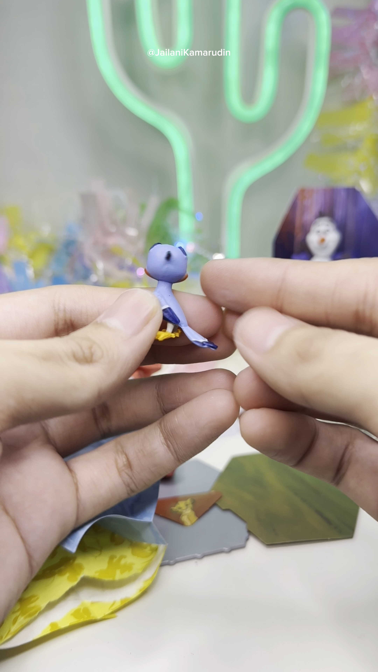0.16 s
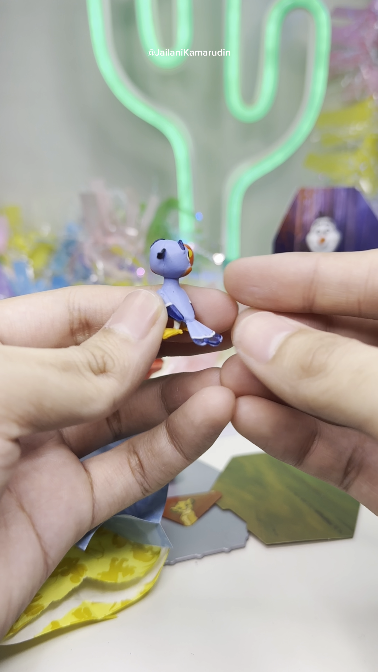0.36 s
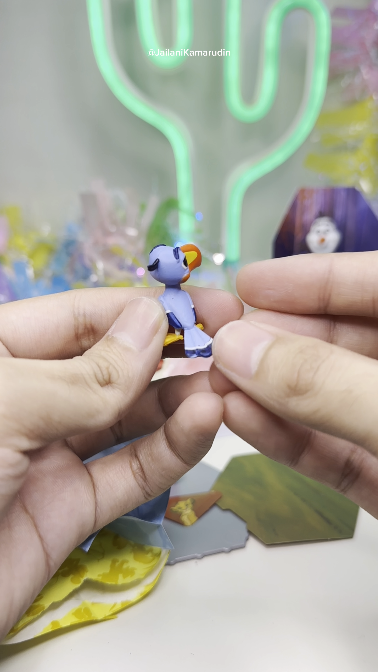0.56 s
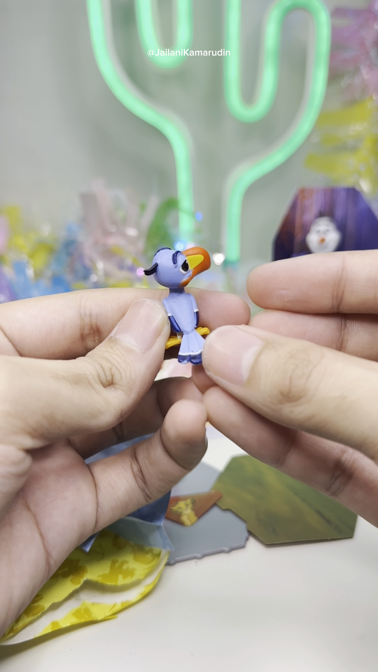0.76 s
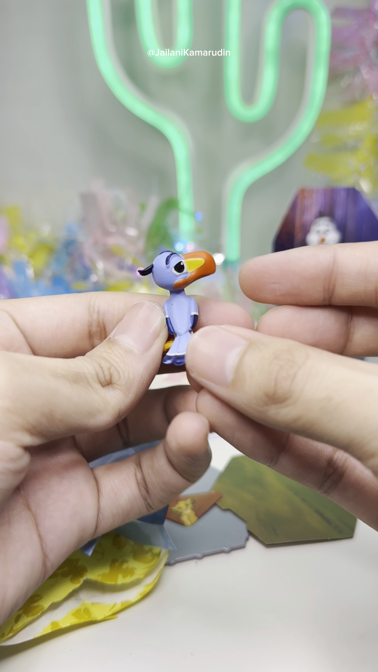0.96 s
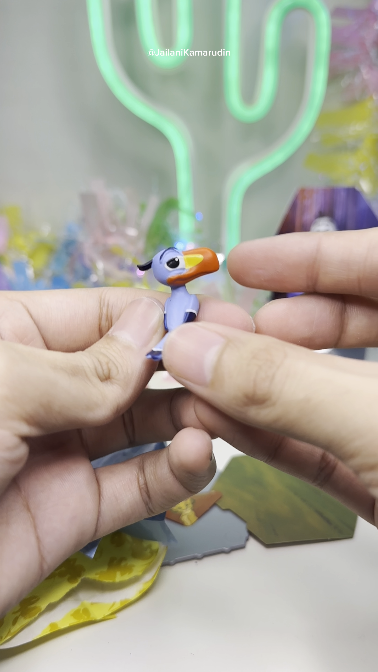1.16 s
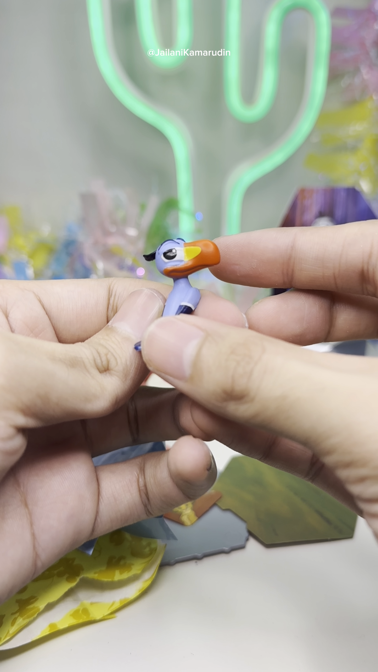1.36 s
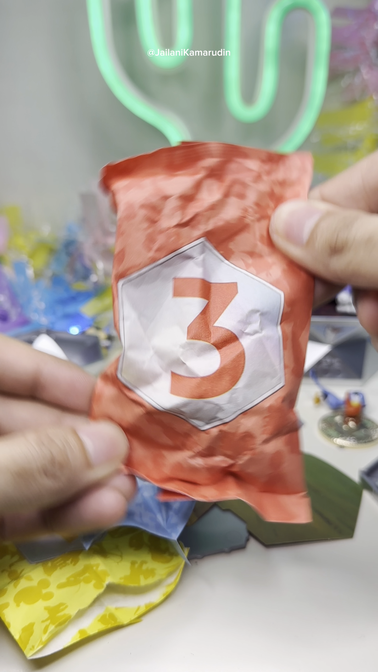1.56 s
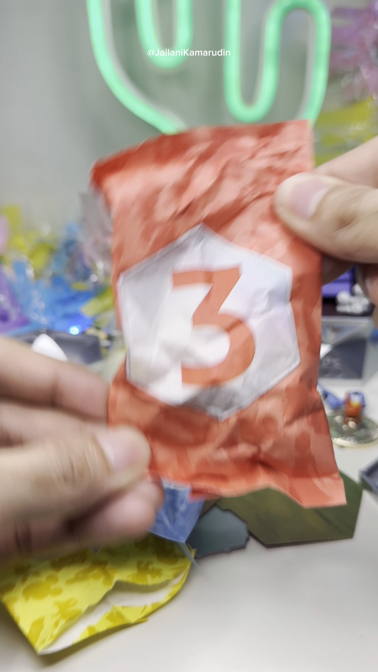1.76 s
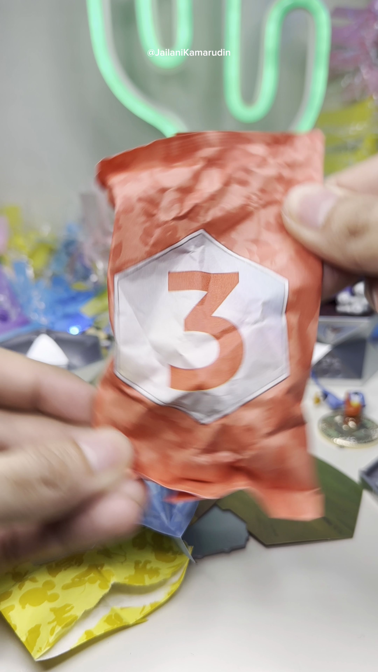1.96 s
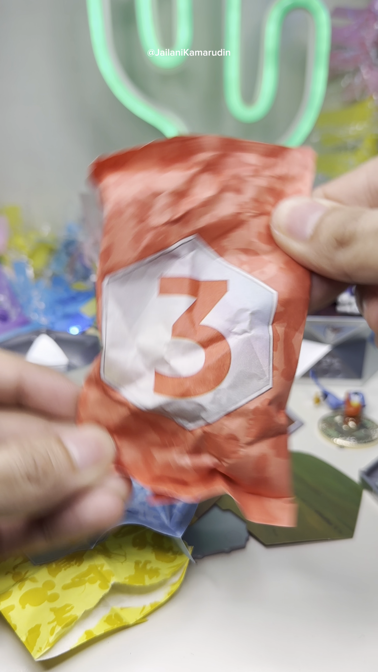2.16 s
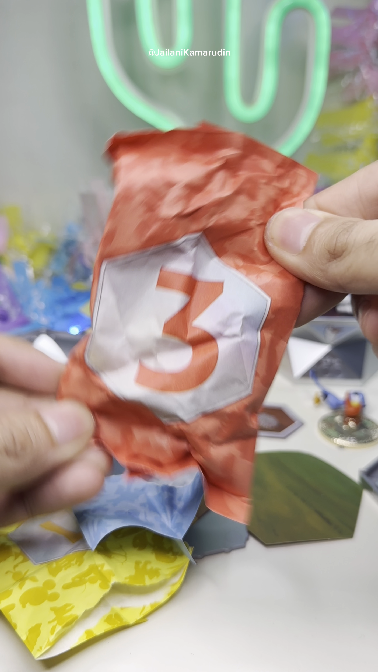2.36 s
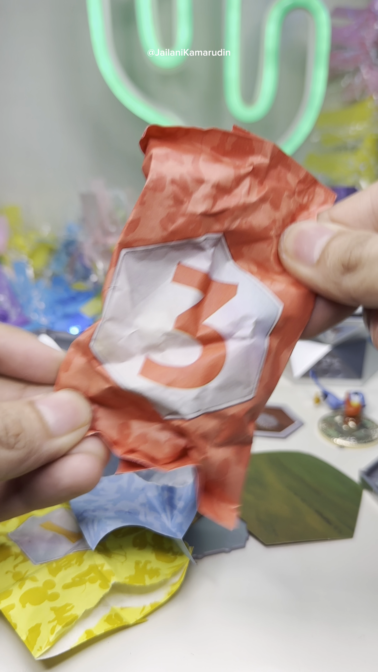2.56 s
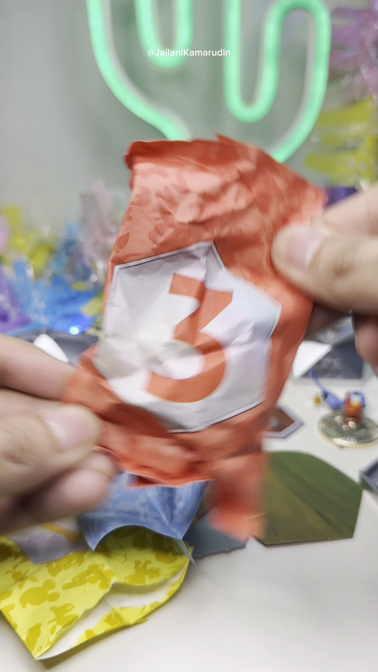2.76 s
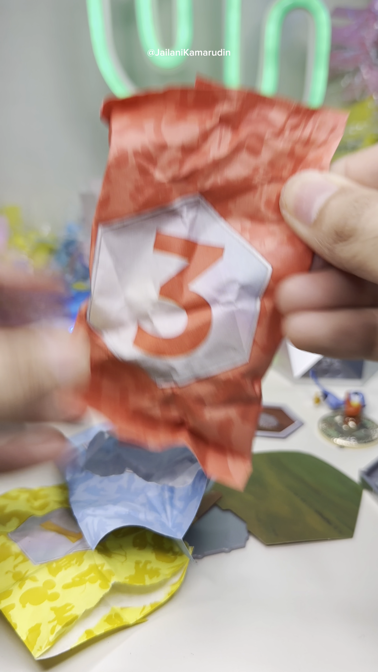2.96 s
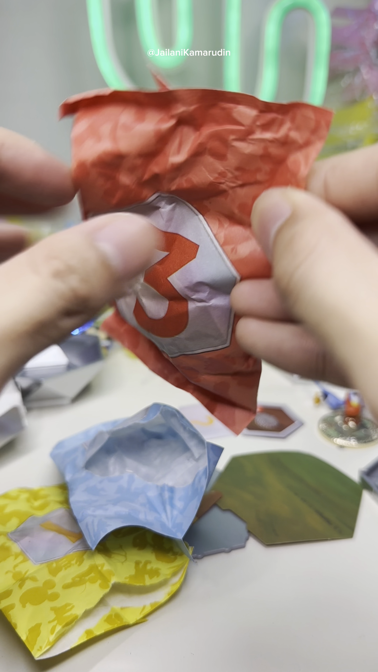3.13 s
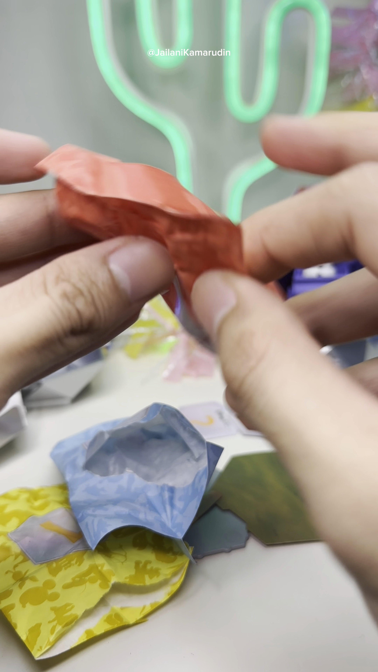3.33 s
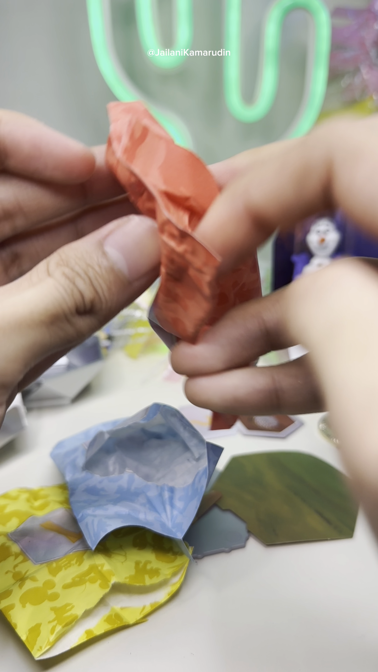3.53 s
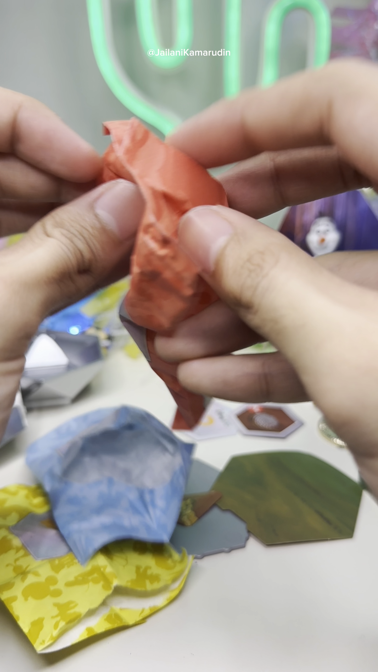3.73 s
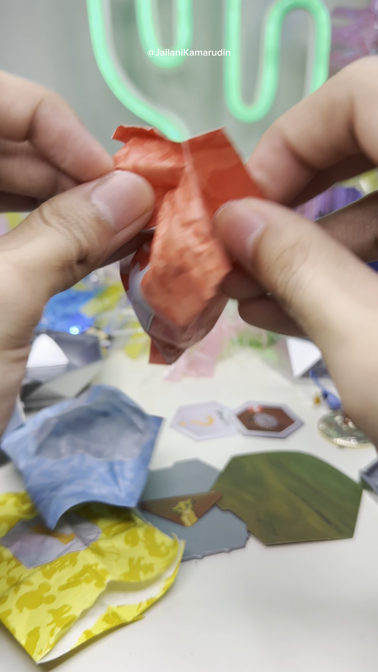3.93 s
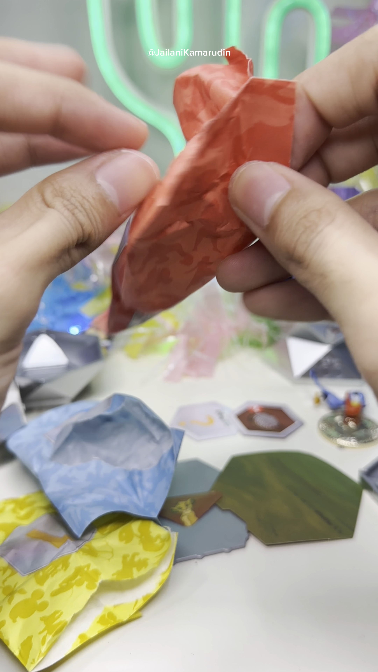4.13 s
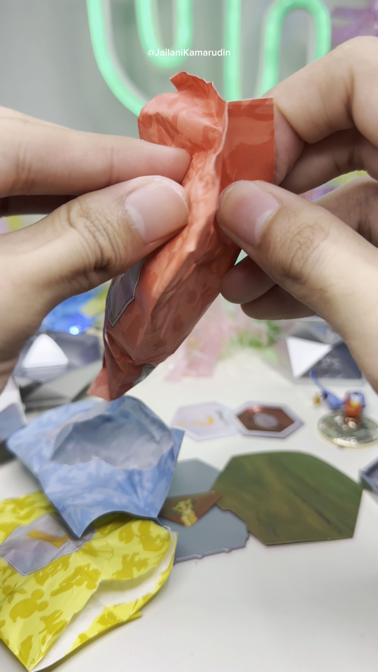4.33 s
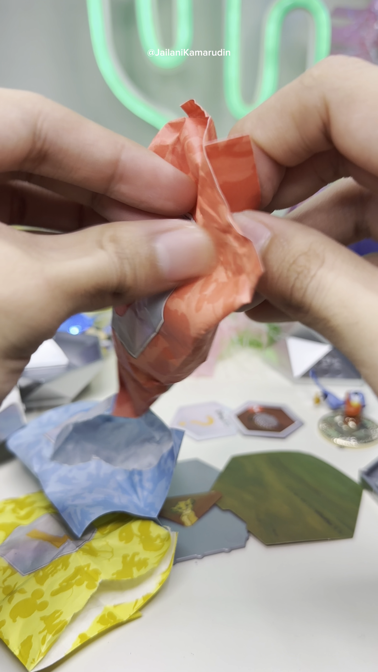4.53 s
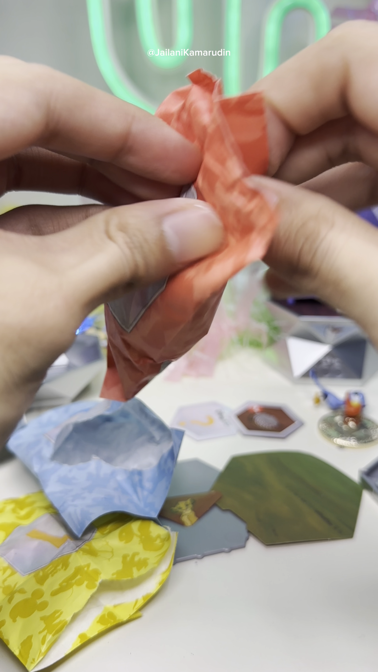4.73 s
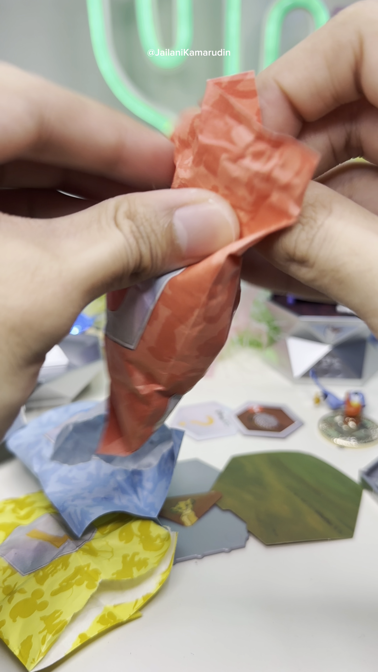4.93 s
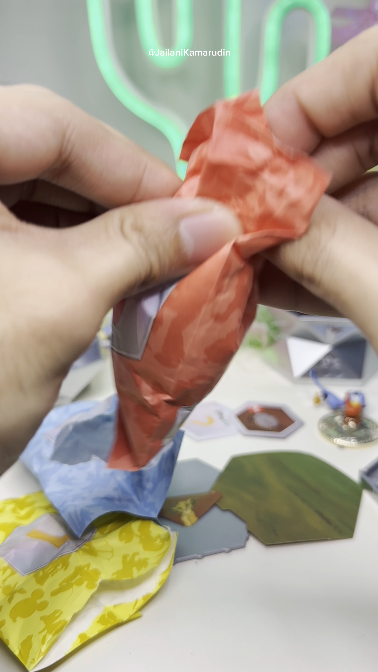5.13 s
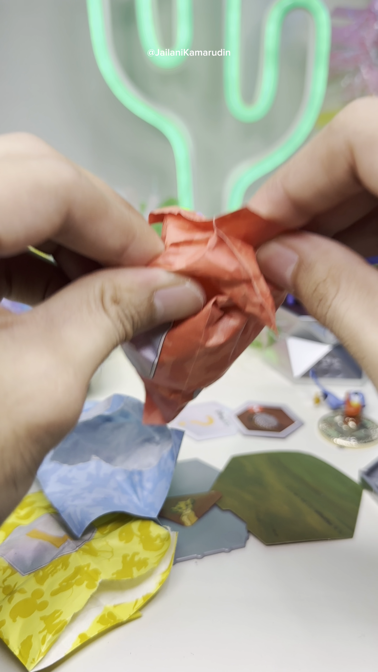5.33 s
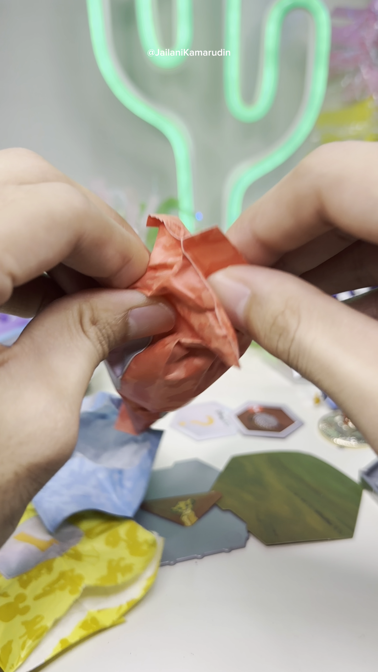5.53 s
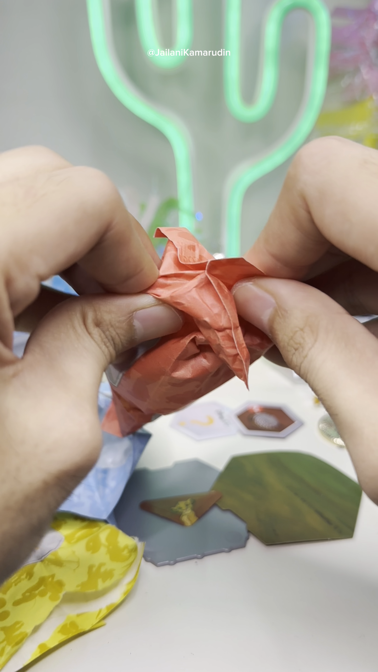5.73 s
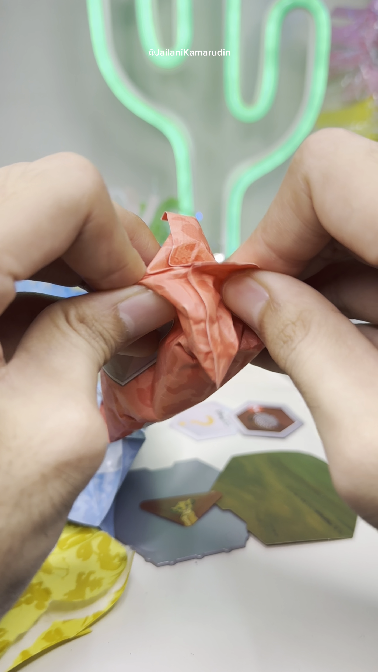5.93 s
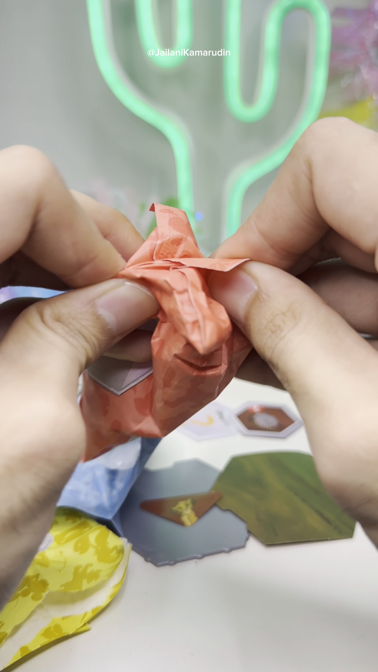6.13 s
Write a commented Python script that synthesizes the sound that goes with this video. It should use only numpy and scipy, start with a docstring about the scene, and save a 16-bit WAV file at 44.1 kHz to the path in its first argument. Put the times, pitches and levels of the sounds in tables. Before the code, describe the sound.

After near silence over a low hum, stiff thin paper snaps and crinkles close by, growing busier as its glued seam peels in stuttering slips.

```python
"""Fingers rub over a small plastic figure, then shake, crumple and pull at a thin paper bag, close to
a stereo microphone in a quiet room. Creases snap as noise bursts over a bed of tiny random clicks;
squeezes scrape ringing folds. A glued seam peels in quick slips that pluck damped modes, and the bag
flaps in one low mode. A noise rumble with a wavering hum and a faint whirr lies beneath."""
import sys
import numpy as np
from scipy import signal
from scipy.fft import rfft, irfft, next_fast_len
from scipy.io import wavfile
from scipy.ndimage import uniform_filter1d

SR = 44100
rng = np.random.default_rng(int(sys.argv[2]) if len(sys.argv) > 2 else 0)


def int16_out(signal):
    """Quantize to a 16-bit WAV file."""
    q = np.round(np.clip(np.atleast_2d(signal).T, -1, 1) * 32767)
    wavfile.write(sys.argv[1], SR, q.astype(np.int16))


N = 277389

# creases snapping, boom and treble relative to the middle peak:
# time_s, middle_peak_db, boom_db, treble_db, ring_hz
SNAPS = [(1.5006, -33, -6.5, -22, 1320), (1.5712, -21, -12, -5, 1450), (1.6174, -27, -9, -35, 1570),
         (1.7076, -19, -11, -31, 1300), (1.773, -49, -8, 6, 2000), (1.7996, -22, -16, 5, 1270),
         (1.818, -13, -19, -20, 2200), (1.8522, -18.5, -33, -5.5, 1400), (1.927, -31, -4, 1, 2850),
         (1.945, -17, -6, -3, 1970), (1.9599, -19.5, -7, 0, 3460), (2.0163, -33, 4.5, -28, 790),
         (2.069, -26.5, -33, -38, 1250), (2.219, -45.5, 3, -13, 2680), (2.252, -42, 2, -10, 2580),
         (2.2678, -31.5, -8, 12.5, 2800), (2.38, -40.5, -17, -18, 2720), (2.448, -45, 3, -15, 2760),
         (2.467, -36.5, 3, -11, 2770), (2.5278, -25, -10, -17, 960), (2.634, -33, -25, -24, 920),
         (2.667, -39, -6, -4, 2780), (2.682, -42.5, 4, 4, 2720), (2.748, -37.5, -14, 2, 2040),
         (2.7919, -40, 7.5, 9.5, 4170), (2.809, -39.5, 4, -2, 1820), (2.857, -44, 6, 5, 2700),
         (2.935, -28.5, -27, 0, 2750), (3.116, -35.5, 6.5, 5.5, 2100), (3.1554, -40, -17, 8, 1230),
         (3.174, -45, -7, 13, 1150), (3.22, -23.5, -2, -1, 1830), (3.2299, -27.5, 0, 6, 1670),
         (3.2452, -21.5, -4, 16.5, 1630), (3.2673, -28, -26, -17, 2460), (3.292, -30, -23, -12, 2430),
         (3.432, -34, -8, 2.5, 1900), (3.4479, -32.5, -4.5, -8, 1930), (3.5083, -30.5, -2.5, -23, 990),
         (3.57, -27, -10, 0, 3700), (3.621, -30.5, 2.5, 13, 2520), (3.655, -39, -4, 25, 4300),
         (3.672, -33, 2, -8, 1910), (3.6953, -25.5, -5, -19, 2560), (3.7602, -27.5, -8, -14, 1190),
         (3.7784, -5, -5, -1, 1650), (3.8076, -17.5, -29, 1, 1700), (3.821, -22, -14, 3, 3200),
         (3.854, -32.5, -1, -19, 1590), (3.8939, -26, -6, -23, 1910), (3.923, -12.5, -12.5, 2.5, 2400),
         (3.968, -22.5, -28, 3, 3380), (4.056, -26, -13, 2, 3330), (4.0731, -25.5, -2, -17, 1680),
         (4.097, -32, 0, -14, 1860), (4.267, -40, -18, 4, 3020), (4.289, -37, -6, -3, 2000),
         (4.299, -24, -4.5, -21, 2200), (4.324, -23.5, -20, 6.5, 2100), (4.3336, -21, -10, 10, 2340),
         (4.3559, -23.5, 7.5, -13, 670), (4.368, -21, -3, 7.5, 1950), (4.379, -22, -12, -18, 2080),
         (4.3904, -11.5, -24, -3, 630), (4.41, -12.5, -13, 3.5, 2080), (4.4151, -8, -27, -1, 600),
         (4.431, -19.5, -1, 4, 1030), (4.493, -27, -17, -20, 2100), (4.518, -28, -31, 5, 2030),
         (4.56, -16, -16.5, 12, 1550), (4.6049, -12.5, -13, 2.5, 654), (4.6602, -18, -38, 8, 2200),
         (4.675, -15.5, -5, 8, 1740), (4.703, -21.5, -8, -10, 1860), (4.746, -17.5, -22, -1.5, 2470),
         (4.839, -20, -9, -3, 2400), (4.8561, -19.5, -9, -13, 2200), (4.8901, -23.5, -14, 4.5, 694),
         (4.931, -22, -18, 10, 4200), (4.9392, -26, -27, -8, 2550), (4.947, -26.5, -28, -4, 810),
         (4.9604, -18.5, -14, 6, 1800), (4.97, -17, -29, -1, 3850), (4.987, -20.5, -39, 6.5, 1900),
         (5.008, -20.5, -16, -12, 3540), (5.04, -34, -9, 8, 900), (5.061, -43, -12, 12, 3920),
         (5.071, -44, -4, 2, 1187), (5.0824, -37, -4, 12.5, 997), (5.0918, -28.5, -9, 1, 1050),
         (5.109, -20, -32, -5, 1000), (5.124, -23.5, -15, -12, 2160), (5.143, -13, -11, -33, 1700),
         (5.1623, -27, -4.5, 11, 4500), (5.168, -25.5, -28, 18.5, 1980), (5.177, -37, -20, 17, 2080),
         (5.219, -30, -15, -22, 1970), (5.235, -31, -8, -16, 3810), (5.2583, -15.5, -3, -0.5, 3530),
         (5.278, -24.5, -8, -19, 3230), (5.309, -28.5, -5, -21, 2060), (5.42, -28, -26, -15, 2200),
         (5.439, -38, -1, -8, 1890), (5.597, -34.5, -6, 6, 1420), (5.616, -48, -10, 3, 2000),
         (5.81, -21.5, -27, 2, 940), (5.8238, -20.5, -5, -23, 940), (5.84, -13, -25, -21, 2700),
         (5.8501, -11, -39, 3, 930), (5.8596, -19.5, -6, -26, 940), (5.8933, -21.5, -11, 3, 2160),
         (5.908, -13.5, -29, -5.5, 1010), (5.917, -20, -12, -17, 1130), (5.9429, -15.5, -21, -12, 3700),
         (5.9816, -24.5, -33, -10, 1190), (6.034, -27, -38, -18, 3380), (6.041, -17, -43, -1.5, 2290),
         (6.0761, -28.5, -9, -19, 1113), (6.091, -30, -17, 0, 2060), (6.1199, -20.5, -33, -26, 2900),
         (6.141, -23, -38, -20, 4450), (6.1496, -13, -40, 4, 2670), (6.162, -27, -29, -17, 2740),
         (6.1771, -27.5, -26, -14, 3130), (6.207, -30.5, -28, -16, 2080), (6.243, -31, -25, 1, 3700),
         (6.251, -32.5, -20, 9, 4370)]
# grip on the bag, as the quietest crackle, treble and boom relative to it:
# time_s, crackle_db, treble_db, boom_db
GRIP = [(1.495, -61, -9, 4), (1.9, -65.5, -4, 6), (2.05, -71.5, -2.5, 14.5), (2.3, -74.5, 2, 18.5),
        (2.6, -61.5, -7, 11.5), (2.9, -54.5, -6, 2.5), (3.13, -57.5, -10, 12), (3.39, -58.5, -10, 0),
        (3.5, -54, -7, -9), (3.62, -49, -1.5, -1.5), (3.95, -47, -2, -13), (4.14, -58.5, 3.5, 5),
        (4.5, -57.5, 6, 7.5), (4.9, -46, -0.5, -10.5), (5.34, -51, -8.5, -14), (5.63, -50.5, -1.5, -12),
        (5.75, -50, 4, -34), (6.03, -50, -6.5, -31), (6.29, -57, 3, -20)]
# squeezes that drag paper over paper, treble and boom relative to the crackle:
# time_s, crackle_db, treble_db, boom_db, fold_ring_hz
SQUEEZES = [(2.32, -55.5, -8, -7, 1000), (2.429, -55.5, -17, 0, 2800), (2.55, -56, -22, 8, 1400),
            (2.68, -54.5, -13, 5, 2800), (2.812, -59, -19, 14, 1020), (2.884, -53.5, -0.5, -13, 2860),
            (3.007, -54.5, 4, 17, 2200), (3.075, -59, -12, 9.5, 900), (3.241, -41.5, 3, 7.5, 1770),
            (3.335, -51.5, 2, -8, 2200), (3.444, -52.5, 0, -1, 2800), (3.573, -48, 5.5, -15, 3680),
            (3.72, -41.5, 5, -10, 2100), (4.01, -48.5, 0.5, -11, 2100), (4.085, -47.5, -2.5, 3.5, 1870),
            (4.181, -47.5, -2.5, -5, 4170), (4.241, -39, -3.5, -9, 2180), (4.402, -34.5, -1, 4, 2070),
            (4.541, -46, 11.5, -2, 8500), (4.691, -34.5, 3.5, -13, 1970), (4.859, -39.5, -2, -8.5, 2300),
            (5.182, -40.5, -0.5, -23, 6900), (5.286, -38.5, -6, -0.5, 1900), (5.37, -40.5, -6, -14, 3620),
            (5.443, -47.5, 1.5, -4, 2100), (5.473, -51.5, 5, -4, 8600), (5.544, -44.5, -7, -8, 1290),
            (5.785, -45.5, 2.5, -23, 3100), (5.962, -46.5, -2, -18, 2100), (6.19, -41.5, 0.5, -27, 3000)]
SQUEEZE_RISE_DB_PER_S, SQUEEZE_FALL_DB_PER_S = 502, 298


def snaps():
    """Buckling: a crease lets go in a noise burst of treble, ringing middle and a later, longer boom."""
    usual_hz, shortens = 1540, 0.25   # the higher a crease rings, the shorter it snaps
    fall_db_per_s = 4000              # before each burst is stretched
    samples = 1536
    time_s, peak_db, boom_db, treble_db, ring_hz = np.transpose(SNAPS)[:, :, None]
    white = rng.standard_normal((len(SNAPS), 5, samples))
    pan_db = rng.normal(0, 0.3, (len(SNAPS), 1))
    length = (usual_hz / ring_hz) ** shortens

    def burst(count, stretch, delay_s):
        """Transient decay: noise with a fast onset, an early accent and an exponential fall."""
        age = np.maximum(np.arange(samples) / SR - delay_s, 0)
        onset = 1 - np.exp(-age / 0.00007)
        accent = 1 + 1.37 * np.exp(-age / 0.00033)
        fall = from_db(-fall_db_per_s * age / (stretch * length))
        return white[:, count] * onset * accent * fall

    ring_bursts = burst(count=0, stretch=0.88, delay_s=0.000098)
    widths_hz = 650 / length[:, 0]
    rung = np.array([resonance(resonance(row, hz, width_hz), hz, width_hz)
                     for row, hz, width_hz in zip(ring_bursts, ring_hz[:, 0], widths_hz)])
    middle_noise = band(burst(count=1, stretch=1.0, delay_s=0), 920, 3880)
    middle = peak_one(peak_one(rung) + 0.79 * peak_one(middle_noise))
    treble_noise = band(burst(count=2, stretch=0.99, delay_s=0), 5000, 15300)
    treble = from_db(treble_db) * peak_one(treble_noise)
    boom_noise = band(band(burst(count=3, stretch=1.04, delay_s=0.00081), 220, 1040), 220, 1040)
    boom = from_db(boom_db) * peak_one(boom_noise)
    # each port faces another part of the sheet
    side = from_db(-17) * peak_one(band(burst(count=4, stretch=0.8, delay_s=0), 390, 6100))
    mid = middle + treble + boom
    pairs = from_db(peak_db) * np.array([mid / from_db(pan_db) + side, mid * from_db(pan_db) - side])
    out = np.zeros((2, N + samples))
    for k, at in enumerate(np.round(time_s[:, 0] * SR).astype(int)):
        out[:, at:at + samples] += pairs[:, k]
    return out[:, :N]


def rustle():
    """Modal excitation: fibre fizz and separate small ticks shake neighbouring patches of the sheet."""
    # air and folds inside the bag colour the crackle: centre_hz, width_hz, level_db re the plain crackle
    bag_air = [(2080, 98, -1.5)]
    # part that reaches the two ports unalike: freq_hz, level_db re the shared part
    unalike_parts = [(1000, -14), (1800, -19), (3500, -15), (4800, -4), (6000, -15), (10000, -11)]
    patches, small_ticks_share, tick_t60_s = 18, 0.75, 0.005   # share is relative to the fizz
    crackle_db, treble_db, boom_db = crackle_levels()

    at = np.flatnonzero(rng.random(N) < 200 * from_db(4 * drift(12)) / SR)   # about 200 ticks per second
    chance, centre, reach = rng.random((len(at), 3)).T
    size = from_db(-3 * np.log(np.maximum(chance, 0.15)))
    white = rng.standard_normal((2, N))
    fall = from_db(-60 / (tick_t60_s * SR))
    fizz = rms_one(grains(7000, spread_db=3) * np.sign(white) * from_db(3 * drift(35)))
    folds = [drift(10) for _ in range(patches + 1)]   # neighbouring patches share a fold

    out = np.zeros((2, N))
    for k, hz in enumerate(np.geomspace(210, 15000, patches)):
        treble_share = np.clip(np.log2(hz / 3000) / 0.95, 0, 1)
        boom_share = np.clip(np.log2(900 / hz) / 1.6, 0, 1)
        # each patch carries its part of the band that it lies in
        level_db = crackle_db - 11.0 - 1.0 * max(np.log2(400 / hz), 0)
        level_db = level_db + treble_share * (treble_db + 7.5) + boom_share * (boom_db + 0.5)
        kicks = np.zeros(N)
        kicks[at] = size * np.exp(-((k / patches - centre) / (0.06 + 0.3 * reach ** 2)) ** 2)
        # rolling the noise gives every patch its own stretch of it
        tick_noise = signal.lfilter([1], [1, -fall], kicks) * np.roll(white, 3000 * k, axis=1)
        shaken = small_ticks_share * rms_one(tick_noise) + np.roll(fizz, 5000 * k, axis=1)
        unalike = from_db(at_hz(unalike_parts, hz))
        patch = rms_one(resonance(shaken * [[1], [unalike]], hz, hz * 0.34))
        shifting_db = 2.4 * (folds[k] + folds[k + 1])
        mid, side = from_db(level_db + shifting_db) * patch
        out += mid + side * [[1], [-1]]
    out = out + sum(from_db(db) * resonance(out, hz, width_hz) for hz, width_hz, db in bag_air)
    return out * (np.arange(N) > GRIP[0][0] * SR)   # silent until the hand grips


def crackle_levels():
    """Power addition: grip, squeezes and snap trails sum to crackle dB, with relative treble and boom."""
    # after each snap the sheet settles with a short trail of crackle, treble and boom re the trail
    trail_db, trail_treble_db, trail_boom_db, trail_fall_db_per_s = -27.5, -14.5, -11, 276
    grip_db, *grip_colour = in_time(GRIP)
    squeeze_s, squeeze_db, *squeeze_colour = np.transpose(SQUEEZES)[:4]
    snap_s, snap_db = np.transpose(SNAPS)[:2]
    trail = swells(snap_s, snap_db + trail_db, 930, trail_fall_db_per_s)

    def total_db(grip_re_db, squeeze_re_db, trail_re_db):
        """Incoherent sum: the three powers add in one band, each offset by its colour."""
        grip = from_db(grip_db + grip_re_db) ** 2
        squeezes = swells(squeeze_s, squeeze_db + squeeze_re_db, SQUEEZE_RISE_DB_PER_S, SQUEEZE_FALL_DB_PER_S)
        return 10 * np.log10(grip + from_db(trail_re_db) ** 2 * trail + squeezes)

    middle = total_db(0, 0, 0)
    treble = total_db(grip_colour[0], squeeze_colour[0], trail_treble_db)
    boom = total_db(grip_colour[1], squeeze_colour[1], trail_boom_db)
    return middle, treble - middle, boom - middle


def folds_ringing():
    """Friction-driven resonance: each squeeze scrapes a fold that rings at a pitch of its own."""
    fold_db, relative_width = -1, 0.086   # ring re the crackle; width re the pitch
    out = np.zeros(N)
    scrape = grains(2500 * from_db(4 * drift(40)), spread_db=3.5)
    for s, crackle_db, _, _, hz in SQUEEZES:
        near = slice(round((s - 0.15) * SR), round((s + 0.15) * SR))
        power = swells([s], crackle_db + fold_db, SQUEEZE_RISE_DB_PER_S, SQUEEZE_FALL_DB_PER_S)
        out[near] += np.sqrt(power)[near] * rms_one(resonance(scrape[near], hz, relative_width * hz))
    return out


def seam():
    """Stick-slip and dispersion: every slip plucks the taut paper; bending waves bring low modes last."""
    # slips of the glued seam: time_s
    slip_times = [5.6606, 5.6693, 5.6828, 5.6994, 5.705, 5.7112, 5.7235, 5.737, 5.744, 5.752, 5.756, 5.76,
                  5.765, 5.769, 5.7749, 5.7808, 5.79, 5.7944]
    # ring of the taut seam: mode_hz, level_db, t60_s
    seam_modes = [(990, -4.5, 0.0083), (2100, -5, 0.0057), (3400, -3.5, 0.0051), (5440, -4, 0.0046),
                  (9500, 0.5, 0.0014)]
    # between slips the glue tears on in fine pulls: start_s, end_s, level_db
    peel = (5.73, 5.995, -34.5)
    peel_grows_s, low_cut_hz = 0.1, 585
    slip_db, full_hold_s, tires_db_per_s = -18, 0.009, 8
    s = np.array(slip_times)
    # the longer the glue has held, up to the full hold, the harder it lets go
    held = np.minimum(np.diff(s, prepend=0) / full_hold_s, 1)
    strength = held * from_db(slip_db - tires_db_per_s * (s - s[0]))
    time = np.arange(N) / SR
    start, end, peel_db = peel
    pull = np.clip((time - start) / peel_grows_s, 0, 1) * (time < end)
    out = np.zeros(N)
    for hz, level_db, t60 in seam_modes:
        pull_gain = from_db(peel_db - hz / 600 + 0.64 * drift(15))   # fine pulls are weaker in high modes
        clicks = pull_gain * grains(2000, spread_db=1.0) * pull
        arrivals = np.round((s + 0.73 / hz) * SR).astype(int)
        clicks[arrivals] = strength * from_db(level_db + rng.normal(0, 3.9, len(s)))
        out += ring(clicks, hz, t60)
    return band(out, low_cut_hz, 16000)


def flaps():
    """Forced oscillation: the whole bag pushes air, half a cycle long, into one damped low mode."""
    # flaps of the whole bag: time_s, push_db, mode_hz, t60_s
    bag_flaps = [(3.215, -20, 217, 0.037), (3.225, -8, 225, 0.0085), (3.784, -19, 232, 0.038)]
    out = np.zeros(N)
    for s, push_db, hz, t60 in bag_flaps:
        shape = np.hanning(round(SR / hz / 2))
        push = np.zeros(N)
        push[round(s * SR):][:len(shape)] = from_db(push_db) * shape / shape.sum()
        out += ring(push, hz, t60)
    return band(out, 68, 1500)


def rub():
    """Friction: skin ridges stutter unevenly over resonant hollow plastic; nails tick as damped sines."""
    # nails ticking on the figure: time_s, level_db, ring_hz
    nail_ticks = [(0.2694, -54, 1180), (0.4001, -54, 1090), (0.4466, -49, 1160), (0.8601, -56, 2160),
                  (0.9843, -55, 1160), (1.11, -54, 990)]
    # ring of the figure under the skin: centre_hz, width_hz, level_db
    figure_modes = [(1040, 660, -0.5), (2200, 130, 3.5), (2820, 760, -4.5), (4300, 1100, -5.5),
                    (5500, 590, -4), (9200, 1900, -6)]
    # fingers resting on the figure: start_s, end_s, level_db
    touches = [(0.148, 0.465, -68.5), (0.737, 1.246, -73)]
    # slides of the fingers: time_s, level_db
    slides = [(0.205, -59), (0.272, -66.5), (0.41, -71), (0.452, -74), (0.79, -64), (0.861, -58),
              (0.99, -61), (1.115, -56.5), (1.18, -65)]
    slide_rise_db_per_s, slide_fall_db_per_s = 304, 292
    touch_s, tick_t60_s = 0.0077, 0.033   # touch_s: fade at either end of a touch
    time = np.arange(N) / SR
    resting = 0
    for start, end, db in touches:
        resting = resting + from_db(db) * np.clip(np.minimum(time - start, end - time) / touch_s, 0, 1)
    sliding_power = swells(*np.transpose(slides), slide_rise_db_per_s, slide_fall_db_per_s)
    level = np.sqrt(resting ** 2 + sliding_power)
    friction = grains(2500 * from_db(5 * drift(45)), spread_db=4.5)
    body = 0
    for k, (hz, width_hz, db) in enumerate(figure_modes):
        mode = from_db(db + 1.2 * drift(22)) * resonance(friction, hz, width_hz)
        body = body + mode * (-1) ** k   # neighbouring modes in opposite phase
    ticks = sum(ring(from_db(db) * (np.arange(N) == round(s * SR)), hz, tick_t60_s)
                for s, db, hz in nail_ticks)
    return level * rms_one(body) + ticks


def room(x):
    """Reverberation: six feedback delays a side, duller on every round."""
    t60_s, wall_cut_hz = 0.13, 10000   # t60 in the bass; the walls shorten it in the treble
    size = next_fast_len(N + SR // 2)
    angle = 2 * np.pi * np.arange(size // 2 + 1) / size
    dull = np.exp(-2 * np.pi * wall_cut_hz / SR)
    walls = (1 - dull) / (1 - dull * np.exp(-1j * angle))
    out = np.zeros((2, size // 2 + 1), complex)
    for k, lag in enumerate((rng.uniform(0.0026, 0.033, 12) * SR).astype(int)):
        loop = from_db(-60 * lag / SR / t60_s) * walls * np.exp(-1j * angle * lag)
        out[k % 2] += loop / (1 - loop) * (-1) ** (k // 2)
    return irfft(out * rfft(x, size), size)[:, :N]


def floor():
    """Partly coherent noise: half-octave bands heave slowly; narrow noise makes a wavering hum and whirr."""
    # spectrum of the rumble before the overall level: freq_hz, band_gain_db
    spectrum = [(20, -23), (35, -13), (60, -8.5), (125, -6.5), (260, -13), (480, -25), (900, -35),
                (5000, -43), (10000, -42.5), (16000, -36)]
    # left-right likeness, clipped to -1..1: freq_hz, likeness
    likeness = [(60, 0.99), (200, 0.95), (380, 0.45), (700, -1.9), (1300, 0.0044), (6800, 0.76)]
    # wavering hum and a faint whirr: centre_hz, width_hz, rms_db
    hum_bands = [(63.7, 4, -60.5), (126.4, 8.7, -67), (2160, 70, -84.5)]
    rumble_rms_db = -59.5
    out, edges = 0, 22 * 2 ** np.arange(0, 9.6, 0.5)
    white = rng.standard_normal((2, 2, N))   # neighbouring bands take different noise
    for k, (low, high) in enumerate(zip(edges, edges[1:])):
        mid, side = band(white[k % 2], low, high)
        hz = np.sqrt(low * high)
        alike = np.clip(at_hz(likeness, hz), -1, 1)
        pair = np.sqrt(1 + alike) * mid + np.sqrt(1 - alike) * side * [[1], [-1]]
        out = out + from_db(at_hz(spectrum, hz) + 2.4 * drift(2.4)) * pair
    hum = sum(from_db(db) * rms_one(resonance(rng.standard_normal(N), hz, width_hz))
              for hz, width_hz, db in hum_bands)
    return from_db(rumble_rms_db) * rms_one(out) + hum


def from_db(db):
    """Logarithmic level: decibels to amplitude gain."""
    return 10 ** (np.asarray(db) / 20)


def rms_one(x):
    """Effective value: scale to rms 1."""
    return x / np.sqrt(np.mean(x ** 2) + 1e-20)


def peak_one(x):
    """Short-time energy: scale bursts by the highest 1 ms mean square, so a steady sine would peak at 1."""
    return x / np.sqrt(2 * uniform_filter1d(x ** 2, size=44).max(axis=-1, keepdims=True))


def in_time(rows):
    """Linear interpolation: columns of a curve table, sample by sample."""
    s, *columns = np.transpose(rows)
    return [np.interp(np.arange(N) / SR, s, c) for c in columns]


def at_hz(points, hz):
    """Logarithmic pitch: value of a frequency table, interpolated on a log-frequency axis."""
    table_hz, values = np.array(points).T
    return np.interp(np.log(hz), np.log(table_hz), values)


def drift(rate_hz):
    """Low-passed noise: slow random motion of rms 1, from a double pole at rate_hz."""
    r = np.exp(-80 * np.pi * rate_hz / SR)   # one value every 40 samples
    white = rng.standard_normal(N // 40 + 2002)
    slow = signal.lfilter([1], [1, -2 * r, r * r], white)[2000:]   # drop the filter's start
    return np.interp(np.arange(N) / 40, np.arange(len(slow)), rms_one(slow))


def band(x, low_hz, high_hz):
    """Band-pass filtering by a Butterworth filter."""
    return signal.sosfilt(signal.butter(2, [low_hz, high_hz], "band", fs=SR, output="sos"), x)


def resonance(x, hz, width_hz):
    """Resonance: a pole pair with gain near 1 on top."""
    r = np.exp(-np.pi * width_hz / SR)
    feedback = [1, -2 * r * np.cos(2 * np.pi * hz / SR), r * r]
    return signal.lfilter([(1 - r * r) / 2, 0, (r * r - 1) / 2], feedback, x)


def ring(clicks, hz, t60):
    """Free damped vibration: a unit click starts a sine of initial height 1."""
    r, w = from_db(-60 / (t60 * SR)), 2 * np.pi * hz / SR
    return signal.lfilter([0, np.sin(w)], [1, -2 * r * np.cos(w), r * r], clicks + 1e-18)


def grains(per_s, spread_db):
    """Random impulses: clicks of either sign, mostly small with a few large ones."""
    sizes = from_db(spread_db * np.minimum(rng.exponential(1, N), 4)) * rng.choice([-1, 1], N)
    return sizes * (rng.random(N) < per_s / SR)


def swells(s, peak_db, rise_db_per_s, fall_db_per_s):
    """Exponential growth and decay: power of events that rise to a peak and die away."""
    tops = np.full(N, 1e-18)
    tops[np.round(np.asarray(s) * SR).astype(int)] = from_db(peak_db) ** 2
    rise, fall = from_db(-2 * rise_db_per_s / SR), from_db(-2 * fall_db_per_s / SR)
    after = signal.lfilter([1], [1, -fall], tops)
    before = signal.lfilter([0, rise], [1, -rise], tops[::-1])[::-1]
    return after + before


def scene():
    """Superposition: all near sources, a little room and the floor add up."""
    near = snaps() + seam() + flaps() + rustle() + folds_ringing() + rub()
    reverberation = from_db(-20) * room(band(near.mean(axis=0), 540, 12600))
    return near * from_db([[-0.2], [0.2]]) + reverberation + floor()


def record(dry):
    """Minimum-phase colour: microphone response, treble lag between ports, rounded peaks, a steep top cut."""
    # colour of the sound, the microphone's up to 11.5 kHz, then a lift near 16 kHz: freq_hz, level_db
    tone_colour = [(30, 0.5), (1500, -1), (2100, 0.5), (2700, -1), (4200, -1), (5000, -3), (5700, -1),
                   (9800, -1), (11500, -15.5), (16000, -5)]
    # the two ports fall out of step in the treble: freq_hz, left_lag_rad
    port_lag = [(30, 0), (4300, 0), (4850, 1.5), (5500, 0), (6500, .2), (8000, 1), (10700, 2.5),
                (12000, 3.1)]
    cutoff_hz = 17000
    size = next_fast_len(N + 4096)
    hz = np.maximum(np.arange(size // 2 + 1) * SR / size, 1)
    cepstrum = irfft(np.log(from_db(at_hz(tone_colour, hz))), size)
    cepstrum[1:size // 2] *= 2      # folding onto positive times gives minimum phase
    cepstrum[size // 2 + 1:] = 0
    lag = at_hz(port_lag, hz) * [[1], [0]]
    response = np.exp(rfft(cepstrum) - 1j * lag)
    wet = irfft(rfft(dry, size) * response, size)[:, :N]
    wet = wet / (1 + (wet / 0.9) ** 4) ** 0.25   # the highest peaks are rounded
    return signal.sosfilt(signal.cheby2(12, 70, cutoff_hz, fs=SR, output="sos"), wet)


dry = scene()
out = record(dry)
int16_out(out)
```